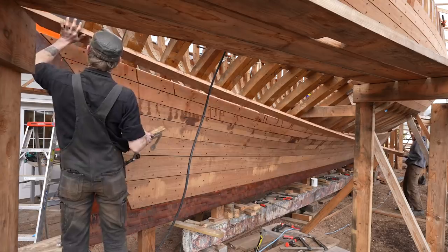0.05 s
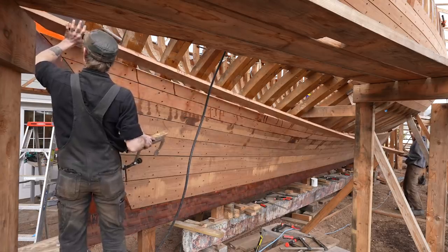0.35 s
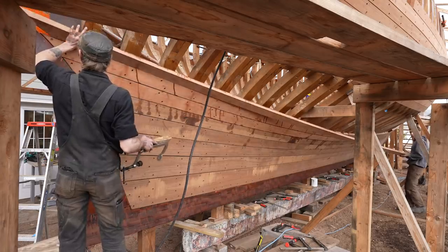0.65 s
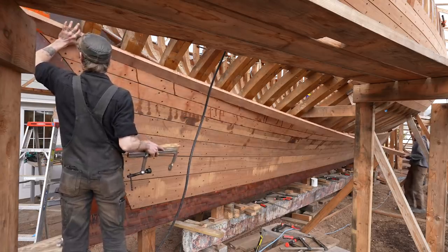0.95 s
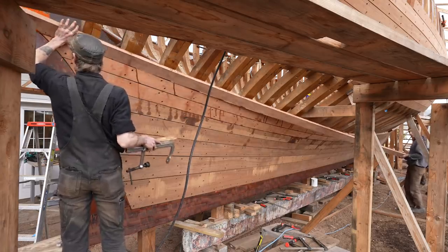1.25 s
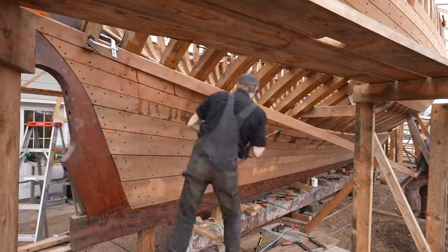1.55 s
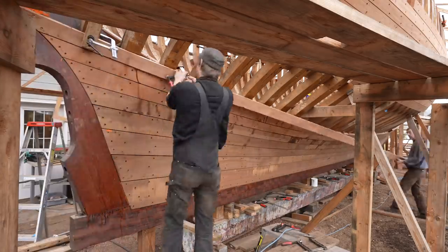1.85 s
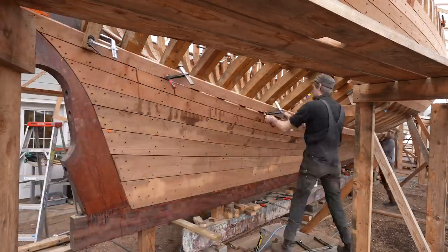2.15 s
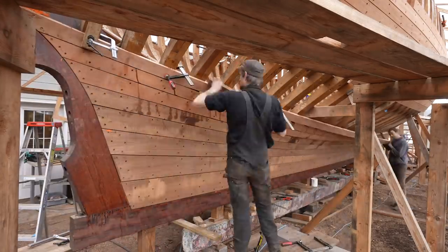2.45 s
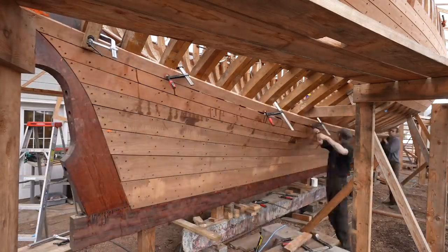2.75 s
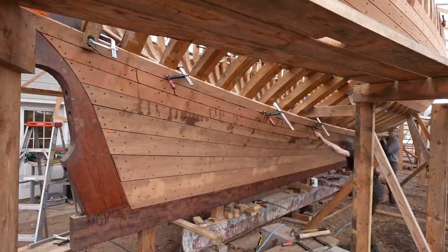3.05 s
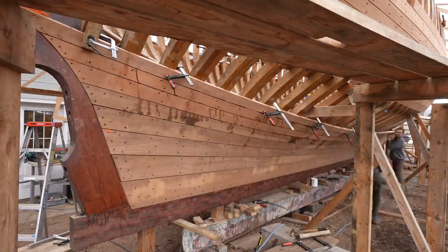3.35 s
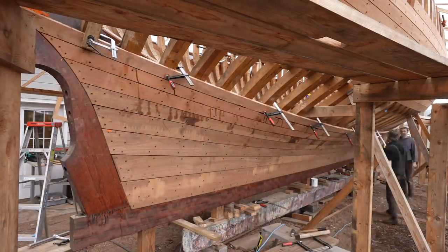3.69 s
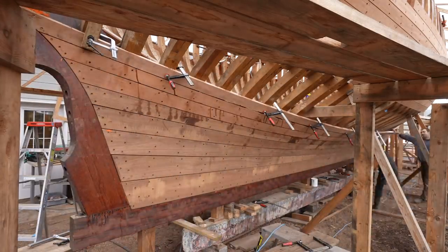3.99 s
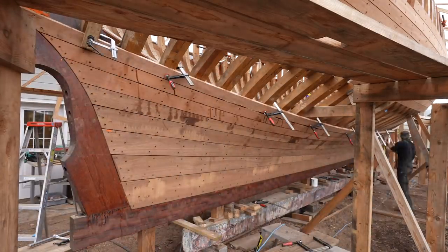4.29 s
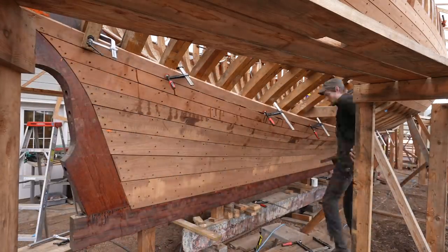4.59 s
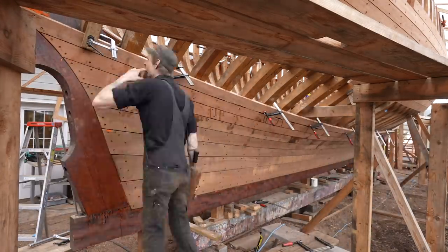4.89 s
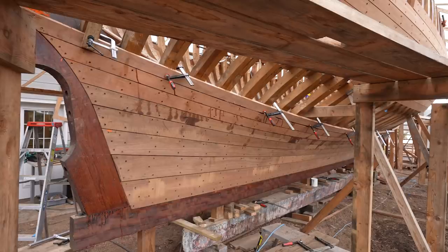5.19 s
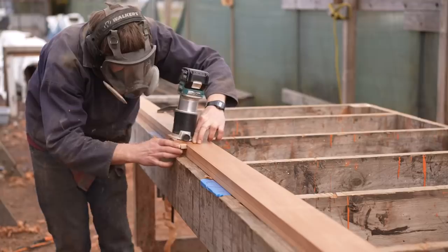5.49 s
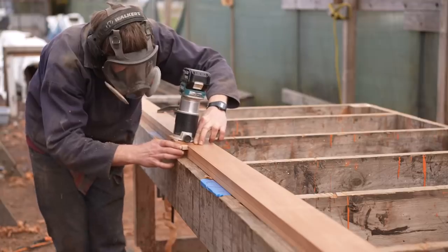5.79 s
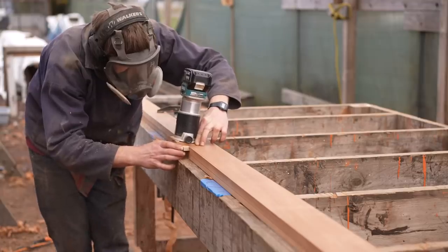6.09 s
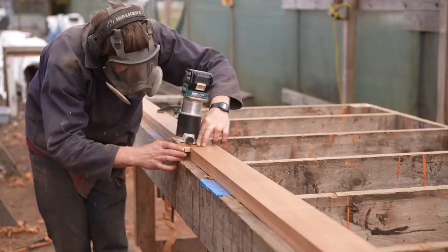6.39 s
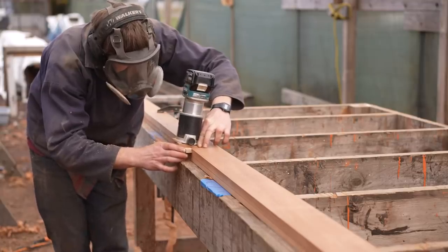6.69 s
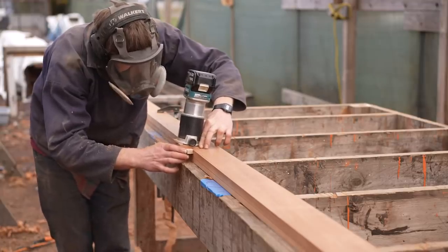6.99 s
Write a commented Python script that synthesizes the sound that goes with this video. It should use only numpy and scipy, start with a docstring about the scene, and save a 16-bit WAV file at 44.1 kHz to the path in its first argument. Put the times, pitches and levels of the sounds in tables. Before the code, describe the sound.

Hammer blows boom on a wooden hull among timber knocks and clamp clicks, then a close router abruptly takes over, whining steadily.

```python
"""Hammer blows boom on a planked hull at the far end of a wooden boat shed, each a dull thud through
the timber, then a bang through the air and a ring of steel; one dropped clamp or plank bangs and rings.
Loose timber knocks and slides and steel clamps click, over low rumble and faint microphone hiss.
All at once a close trim router replaces them: its two-flute cutter whines at a governed speed along
a plank's edge, in a rush of cooling air and chips."""
import sys
import numpy as np
from scipy import signal
from scipy.fft import rfft, irfft
from scipy.io import wavfile

SR = 44100
rng = np.random.default_rng(int(sys.argv[2]) if len(sys.argv) > 2 else 0)


def store_pcm(level_fs):
    """Save levels as 16-bit WAV."""
    pcm = np.round(np.clip(level_fs, -1, 1) * 32767).astype(np.int16)
    wavfile.write(sys.argv[1], SR, np.atleast_2d(pcm).T)


N = 314874
TIME = np.arange(N) / SR
HIT_TIME = np.arange(SR) / SR
ROUTER_START_S = 5.381


# hammer blows and one dropped clamp or plank: start_s, level_db, bite_db, thud_db, steel_db
HULL_IMPACTS = [(.560, -17, 12.5, -21.5, -50.5), (1.004, -18.5, 6, -23, -53), (3.831, -19, 2.5, -22.5, -54),
                (4.055, -18, 9, -45, -36), (4.262, -17.5, 1, -26.5, -56), (4.699, -15.5, 4, -20.5, -46.5)]
# hull planking: pitch_hz, level_db, t60_s
HULL_MODES = [(144.3, -7, 0.34), (170, -15.5, 0.38), (237.2, -9, 0.29), (248.4, -2.5, 0.24),
              (287, -7, 0.18), (321, -13, 0.24), (364.4, -10.5, 0.28), (419.5, -12.5, 0.27),
              (531, -12, 0.24), (610.4, -10, 0.26), (884, -13, 0.24), (1270, -19, 0.2), (1615, -17, 0.38)]
# ringing steel, blurred by the shed: freq_hz, density_db
STEEL_SPECTRUM = [(6500, -48), (7080, -18), (7208, 4), (7330, -16), (7900, -34), (9900, -35),
                  (10300, -27.5), (10800, -40), (13300, -44), (13970, -18.5), (14500, -47.5)]

def hammer_and_drop(lead_s=0.023, steel_t60_s=0.42):
    """Each impact arrives through the timber as a dull thud, then through the air a moment later."""
    out = np.zeros(N)
    for start_s, level_db, bite_db, thud_db, steel_db in HULL_IMPACTS:
        thud = lowpass(lowpass(boom(bite_db=0), 1100, order=4), 653, order=1)
        add(out, start_s - lead_s, from_db(thud_db) * thud * swell(0.0091))
        lumps = from_db(1 + 0.37 * drift(137.4, size=SR))  # separate reflections
        bang = lumps * boom(bite_db) * swell(0.0075)
        planking = ring(HULL_MODES) * swell(0.0036)
        add(out, start_s, from_db(level_db) * (bang + planking))
        steel = noise(STEEL_SPECTRUM, size=SR) * fade(steel_t60_s) * swell(0.0576)
        add(out, start_s, from_db(steel_db) * steel)
    return out


# struck hull and shed: freq_hz, density_db
BOOM_SPECTRUM = [(41, -43), (70, -34.5), (140, -2), (197, -11.5), (230, 3), (462, -5.5), (605, -7),
                 (740, -11), (926, -6), (1360, -10), (6680, -43.5), (7310, -46), (9790, -57), (14000, -59),
                 (15000, -70)]
# their decay: freq_hz, t60_s
BOOM_DECAY = [(100, 0.47), (260, 0.12), (700, 0.25), (1800, 0.33), (4800, 0.4), (13000, 0.27)]

def boom(bite_db, bite_hz=3200, bite_octaves=0.84, tail_db=-27, tail_t60_s=0.89):
    """Dense modes of hull and shed die octave by octave, leaving a faint long tail."""
    spectrum = rfft(noise(BOOM_SPECTRUM, size=SR))
    hz = np.maximum(np.arange(len(spectrum)), 1)
    spectrum *= from_db(bite_db * np.exp(-(np.log2(hz / bite_hz) / bite_octaves) ** 2))
    tail = from_db(tail_db) * fade(tail_t60_s)
    out = np.zeros(SR)
    for centre_hz in 62.5 * 2 ** np.arange(9):
        band = np.maximum(1 - abs(np.log2(hz / centre_hz)), 0)
        out += irfft(spectrum * band, SR) * (fade(at_hz(BOOM_DECAY, centre_hz)) + tail)
    return out


# treble contours of the cut: time_s, upper_db, edge_db
CUT_CONTOURS = [(5.42, -38.5, -44), (5.624, -42, -46), (5.994, -41.5, -47.5), (6.398, -40, -50),
                (6.866, -43.5, -50.5), (7.1, -44, -52.5)]
# cutter whine: spindle_multiple, level_db
WHINE_HARMONICS = [(1, -13), (2, 0), (3, -12.5), (4, -7.5), (5, -10), (6, -10), (7, -19.5), (8, -15.5),
                   (9, -21.5), (10, -21.5), (11, -28), (12, -24), (13, -33.5), (14, -26), (15, -29.5),
                   (16, -27), (17, -34), (18, -35.5), (19, -47), (20, -45), (21, -44), (22, -43.5),
                   (23, -51), (24, -45), (25, -59), (26, -56), (27, -55), (28, -57), (29, -44.5), (30, -64),
                   (31, -52), (32, -70), (33, -57), (34, -65), (35, -53), (36, -59)]
# ball bearing: spindle_multiple, level_db
BEARING_TONES = [(4.097, -57), (6.097, -58), (10.097, -66), (11.19, -68), (12.194, -69), (12.29, -71),
                 (13.097, -70), (29.01, -79)]
# cooling air and chips: freq_hz, density_db
RUSH_SPECTRUM = [(30, -14), (130, -12.5), (250, -17), (450, -8.5), (600, 8.5), (880, 9), (1060, 5),
                 (1300, 8.5), (2000, 3.5), (2700, -1), (3850, -1), (4800, -7), (6200, -7.5), (8000, -15.5),
                 (11000, -15), (15500, -27.5)]

def router(spindle_hz=378.6, wobble_rad=0.011, whine_db=-29, upper_hz=1400, edge_hz=4400, rush_db=-42.5):
    """A two-flute cutter whines, strongest at two cuts a turn, with bearing tones and rushing air."""
    upper_db, edge_db = (db - np.median(db[TIME > ROUTER_START_S]) for db in curves(CUT_CONTOURS))
    # governed: the shaft only wobbles about a steady speed
    angle = 2 * np.pi * spindle_hz * TIME + wobble_rad * (2 * drift(4.7) + drift(60))
    tones = np.zeros(N)
    for multiple, level_db in WHINE_HARMONICS:
        hz = multiple * spindle_hz
        treble_db = 0.85 * edge_db - 2.5 if hz > edge_hz else 0.64 * upper_db if hz > upper_hz else 0
        wander_db = 0.3 * np.sqrt(multiple) * drift(9)
        gain = from_db(whine_db + level_db + treble_db + wander_db) * interference(hz)
        flutter = 1 + 0.05 * np.sqrt(multiple / 2) * drift(90)
        tones += gain * flutter * np.cos(multiple * angle + rng.normal(0, 1.8))
    for multiple, level_db in BEARING_TONES:
        tones += from_db(level_db) * (1 + 0.16 * drift(17)) * np.sin(multiple * angle)
    # one puff of chips per turn, stronger as the edge bites
    puffs = 1 + 0.2 * np.cos(angle)
    rush = from_db(rush_db + 0.13 * edge_db + 0.57 * drift(14)) * noise(RUSH_SPECTRUM)
    return np.sqrt(2) * tones + rush * puffs


# reflections off plank and hand: detour_m, change_m_per_s
ECHO_PATHS = [(1.155, .0036), (.952, -.058)]

def interference(hz, echo_gains=(1, 0.29), sound_m_per_s=343):
    """Near reflections reinforce or cancel a tone as the tool travels; the gain has rms 1 over the pass."""
    feed_s = np.arange(0, N / SR - ROUTER_START_S, 0.01)
    echoes = 0
    for gain, (detour_m, change_m_per_s) in zip(echo_gains, ECHO_PATHS):
        delay_s = (detour_m + change_m_per_s * feed_s) / sound_m_per_s
        echoes += gain * np.exp(-2j * np.pi * hz * delay_s)
    return np.interp(TIME - ROUTER_START_S, feed_s, unit_rms(abs(1 + echoes)))


# timber set down, dropped or bumped: start_s, level_db, contact_hz, freedom (0 held, 1 free)
TIMBER_KNOCKS = [(.064, -56.5, 845, 0.55), (.643, -27.5, 560, .9), (.700, -31.5, 1000, 0.89),
                 (1.602, -40.5, 1610, 0.45), (2.204, -16, 1420, 0.26), (2.558, -50, 2000, 0),
                 (3.157, -21.5, 350, 0.02), (4.037, -22.5, 990, 1), (4.056, -18, 1400, 0.15),
                 (4.099, -24.5, 1300, 0.98), (4.116, -23.5, 1250, 0.75), (4.147, -26, 730, 0.2),
                 (4.207, -28.5, 560, 0.84), (4.241, -25, 600, .5), (4.485, -38, 1520, 0.12),
                 (4.961, -41, 1740, 0.23), (4.99, -39.5, 1660, .4)]
# wood clatter: freq_hz, density_db
CLATTER_SPECTRUM = [(20, -46), (60, -14), (120, -4), (250, 8), (450, -1), (750, 4), (1400, -3.5),
                    (3000, -13.5), (7000, -21), (15000, -19)]
# loose timber: pitch_hz, level_db, t60_ratio
TIMBER_MODES = [(211, -6.5, 0.28), (269.4, -4, 0.44), (617, -23, 2), (697.5, -10.5, 0.6), (792, -7.5, 0.5),
                (869, -7.5, 0.64), (1230, -22, 0.65), (1382, 2.5, 0.23)]
# long plank: pitch_hz, level_db, t60_s
PLANK_MODES = [(176, -2.5, 0.6), (322.4, -4.5, 0.47), (382, -1, 0.31), (398, 2, 0.42), (427, -7, 0.49),
               (448.4, 1, 0.18), (502, -12, 0.44), (777, -13, 0.2)]

def knocks(held_t60_s=0.12, free_t60_s=0.39, modes_db=-1, room_db=-34, crack_db=-7):
    """Timber on timber cracks and clatters: duller for a soft contact, longer for a free piece."""
    out = np.zeros(N)
    for start_s, level_db, contact_hz, freedom in TIMBER_KNOCKS:
        t60_s = held_t60_s * (free_t60_s / held_t60_s) ** freedom
        clatter = noise(CLATTER_SPECTRUM, size=SR) * (fade(t60_s) + from_db(room_db) * fade(t60_s=1))
        modes = from_db(modes_db) * ring(TIMBER_MODES, t60_s)
        body = lowpass(clatter + modes, contact_hz) * swell(0.00088)
        # heavy, soft contacts move more bass
        bass_db = -4 + (level_db + 25) - 5 * np.log2(contact_hz / 900)
        body += (from_db(bass_db) - 1) * lowpass(body, 330, order=1)
        crack = lowpass(noise(SNAP_SPECTRUM, size=SR) * fade(t60_s=0.015), 1.37 * contact_hz)
        plank = from_db(-32 + 31 * freedom) * ring(PLANK_MODES)
        add(out, start_s, from_db(level_db) * (body + from_db(crack_db) * crack + plank))
    # loose boards radiate little deep bass
    return signal.sosfilt(signal.butter(2, 75, "high", fs=SR, output="sos"), out)


# steel clamps: start_s, level_db, contact_hz, t60_s
CLAMP_CLICKS = [(0.343, -49, 6000, 0.03), (1.598, -57.5, 4450, 0.033), (2.224, -30.5, 6200, 0.093),
                (2.275, -38, 6000, 0.068), (2.355, -42.5, 6850, 0.075), (2.485, -53, 5800, 0.064),
                (3.151, -53.5, 8500, 0.083), (3.162, -47, 3980, 0.11), (3.184, -58, 7950, 0.12),
                (3.479, -58.5, 5950, .09), (4.038, -28.5, 10100, 0.053), (4.0572, -16, 13000, 0.011),
                (4.229, -40, 10000, 0.19)]
# hard contact, steel or timber: freq_hz, density_db
SNAP_SPECTRUM = [(200, -7.5), (1000, 7), (1900, 5.5), (3000, 2), (5200, -7.5), (7000, -9.5), (9000, -19),
                 (11500, -18.5), (15500, -25)]
# clamp bar: pitch_hz, level_db, t60_ratio
BAR_MODES = [(1714, -11, 1.2), (2180, -9.5, 1.1), (3490, -15, 0.88), (3800, -16, 1), (4400, -14.5, 1.1),
             (4930, -14.5, 1), (5320, -12.5, 0.62), (6250, -14, 0.66)]

def clamps(snap_db=-2, bar_db=-1, room_db=-27):
    """A clamp snaps and its bar rings briefly, with a faint tail from the shed."""
    out = np.zeros(N)
    for start_s, level_db, contact_hz, t60_s in CLAMP_CLICKS:
        envelope = from_db(snap_db) * fade(t60_s) + from_db(room_db) * fade(t60_s=1)
        snap = noise(SNAP_SPECTRUM, size=SR) * envelope
        bar = from_db(bar_db) * ring(BAR_MODES, t60_s)
        add(out, start_s, from_db(level_db) * lowpass(snap + bar, contact_hz))
    return out


# sliding plank: time_s, level_db
SLIDE_LEVELS = [(1.55, -91), (1.75, -67.5), (1.92, -70), (2.2, -63), (2.45, -78), (2.8, -83), (4.8, -79),
                (5.17, -75), (5.38, -79)]
# wood friction: freq_hz, density_db
SLIDE_SPECTRUM = [(800, -6), (1550, 3.5), (1880, 7), (2250, 0.5), (2900, -1), (3350, 2.5), (3950, -6),
                  (4550, -5), (5200, -11), (7000, -15), (11500, -27), (14000, -38)]

def slide(grain_db=0.5):
    """Wood rubs on wood as a plank slides into place."""
    level_db, = curves(SLIDE_LEVELS)
    return from_db(level_db + grain_db * drift(40)) * noise(SLIDE_SPECTRUM)


# shed rumble and air: time_s, rumble_db, air_db
SHED_LEVELS = [(0, -62.5, -76.5), (.5, -59, -71), (1.4, -59.5, -62), (2.2, -56, -58), (2.4, -56, -58),
               (3.0, -59, -60.5), (3.7, -57, -60.5), (4.5, -53.5, -62), (5.38, -58, -61.5)]
# their spectra: freq_hz, density_db
RUMBLE_SPECTRUM = [(12, -43), (20, -14.5), (70, 4.5), (86, -0.5), (124, -11.5), (146, -6.5), (178, -18.5),
                   (200, -14.5), (260, -29.5), (440, -120)]
AIR_SPECTRUM = [(110, -46.5), (180, -7), (229, 0), (309, -18), (339, -11.5), (387, -8.5), (409, -15.5),
                (664, -8.5), (1000, -13.5), (1400, -23), (3760, -41.5), (15500, -66)]

def shed():
    """Low rumble and quiet air rise and fall."""
    rumble_db, air_db = curves(SHED_LEVELS)
    return from_db(rumble_db) * noise(RUMBLE_SPECTRUM) + from_db(air_db) * noise(AIR_SPECTRUM)


# microphone hiss: freq_hz, density_db
HISS_SPECTRUM = [(200, 5.5), (3000, -4.5), (7000, -13), (11000, -14.5), (15500, -24)]

def microphone_hiss(level_db=-81):
    """Faint, steady self-noise."""
    return from_db(level_db) * noise(HISS_SPECTRUM)


def from_db(db):
    """Decibels to gain."""
    return 10 ** (np.asarray(db) / 20)


def unit_rms(x):
    """Scale to rms 1."""
    return x / np.sqrt(np.mean(x ** 2) + 1e-20)


def curves(rows):
    """Interpolate a timed table's columns at every sample."""
    time_s, *columns = np.transpose(rows)
    return [np.interp(TIME, time_s, column) for column in columns]


def at_hz(points, hz):
    """Read a table on a log-frequency axis."""
    points_hz, values = np.transpose(points)
    return np.interp(np.log(np.maximum(hz, 1)), np.log(points_hz), values)


def noise(spectrum, size=N):
    """Noise of the given spectral shape, rms 1."""
    hz = np.fft.rfftfreq(size, 1 / SR)
    phasors = np.exp(2j * np.pi * rng.random(len(hz)))
    return unit_rms(irfft(from_db(at_hz(spectrum, hz)) * phasors, size))


def drift(rate_hz, size=N):
    """Random wander with a spread of 1."""
    knots = rng.standard_normal(int(size / SR * rate_hz) + 4)
    position = np.arange(size) / SR * rate_hz + rng.random()
    return np.interp(position, np.arange(len(knots)), knots) * np.sqrt(3 / 2)


def lowpass(x, cutoff_hz, order=2):
    """Roll off the treble."""
    return signal.sosfilt(signal.butter(order, cutoff_hz, fs=SR, output="sos"), x)


def fade(t60_s):
    """Exponential decay over the second after a hit."""
    return np.exp(-np.minimum(np.log(1000) * HIT_TIME / t60_s, 40))


def swell(rise_s):
    """Onset as reflections pile up."""
    return 1 - np.exp(-HIT_TIME / rise_s)


def ring(modes, t60_scale=1):
    """Struck modes, varying in strength and sign on every hit."""
    out = np.zeros(SR)
    for pitch_hz, level_db, t60 in modes:
        gain = from_db(level_db + rng.normal(0, 1)) * rng.choice([-1, 1])
        out += gain * np.sin(2 * np.pi * pitch_hz * HIT_TIME) * fade(t60 * t60_scale)
    return out


def add(track, start_s, sound):
    """Mix a sound in at start_s."""
    start = max(round(start_s * SR), 0)
    track[start:start + len(sound)] += sound[:N - start]


def scene(switch_s=0.0016):
    """Work on the hull gives way abruptly to the router."""
    routing = np.clip((TIME - ROUTER_START_S) / switch_s + 0.5, 0, 1)
    hull_work = hammer_and_drop() + knocks() + clamps() + slide() + shed() + microphone_hiss()
    return ((1 - routing) * hull_work + routing * router())[None]


def record(dry, knee=0.12, cutoff_hz=15900):
    """Round the loudest peaks and cut the top treble."""
    rounded = 0.5 * knee * np.tanh(dry / knee) + 0.5 * dry
    return signal.sosfilt(signal.ellip(10, 0.1, 80, cutoff_hz, fs=SR, output="sos"), rounded)


dry = scene()
out = record(dry)
store_pcm(out)
```